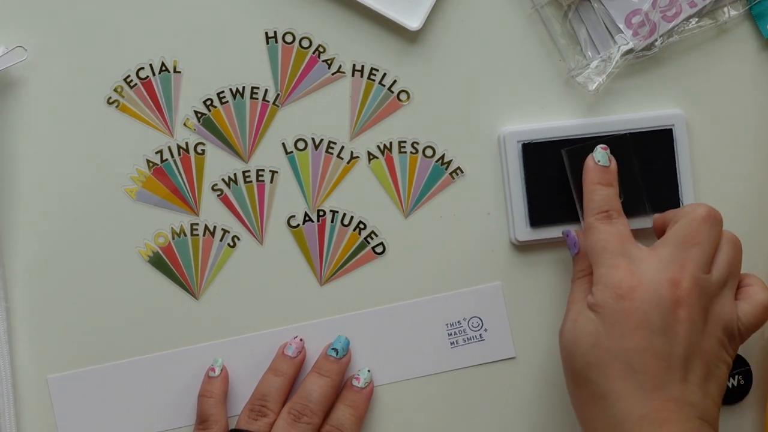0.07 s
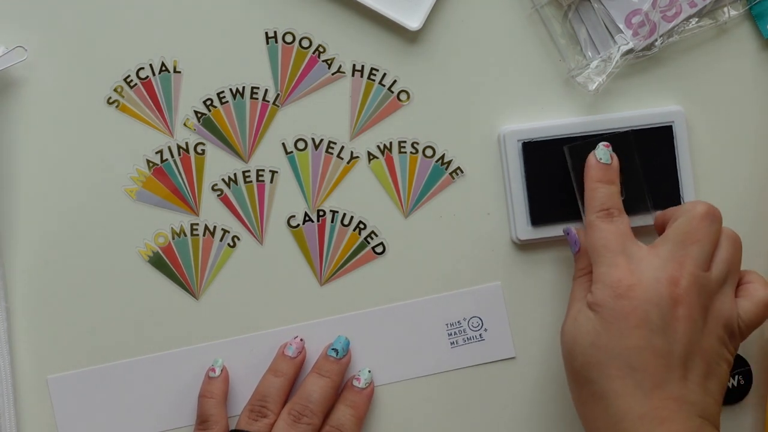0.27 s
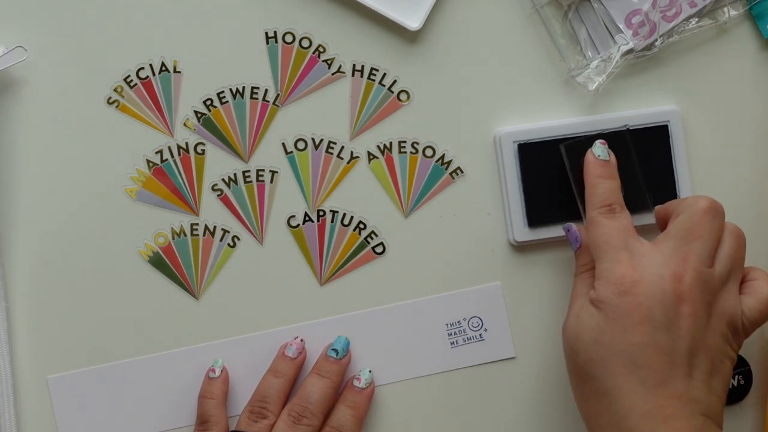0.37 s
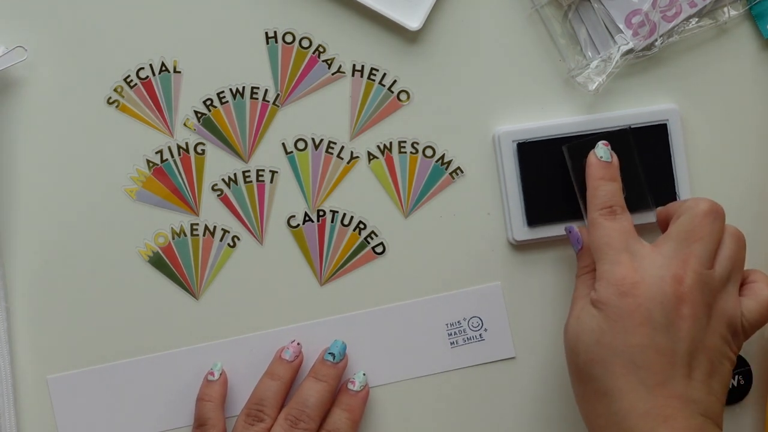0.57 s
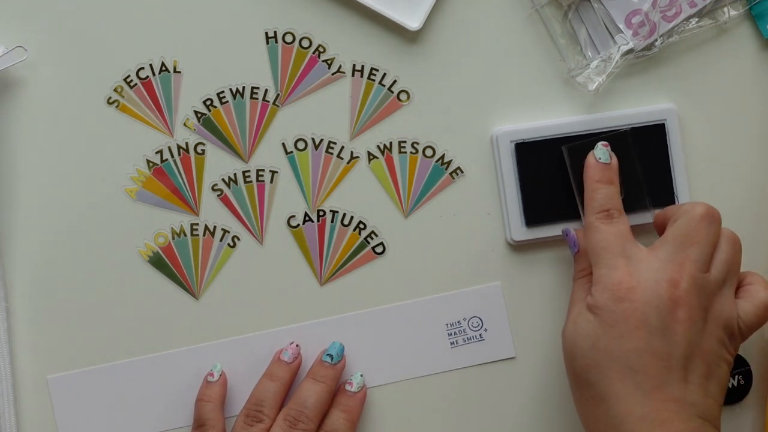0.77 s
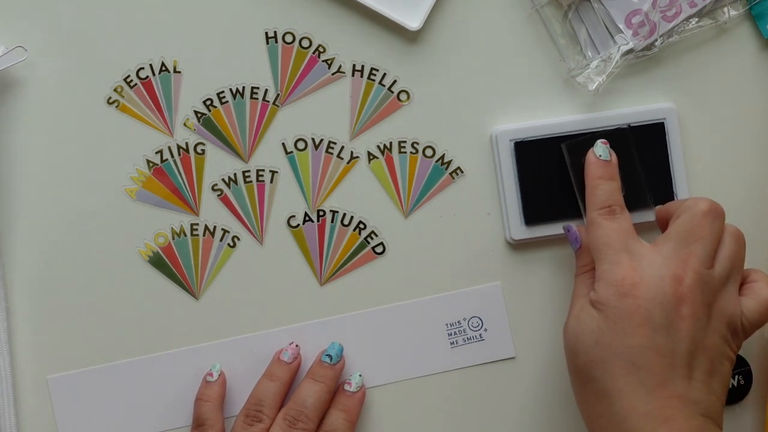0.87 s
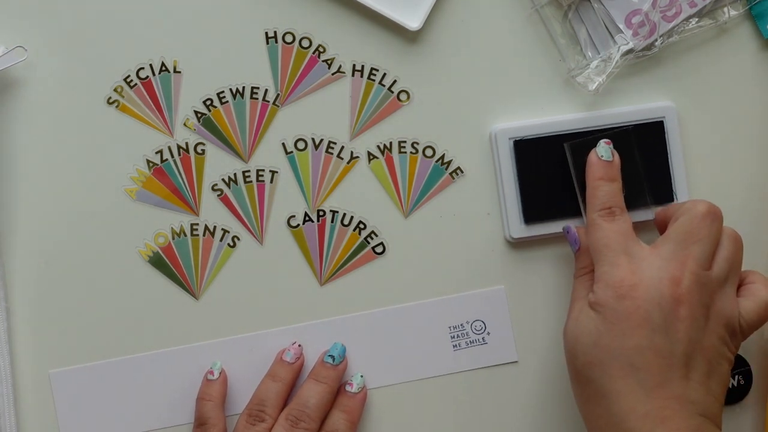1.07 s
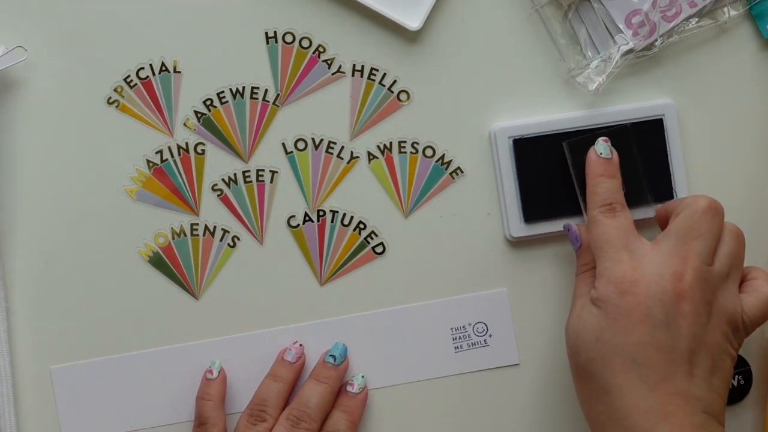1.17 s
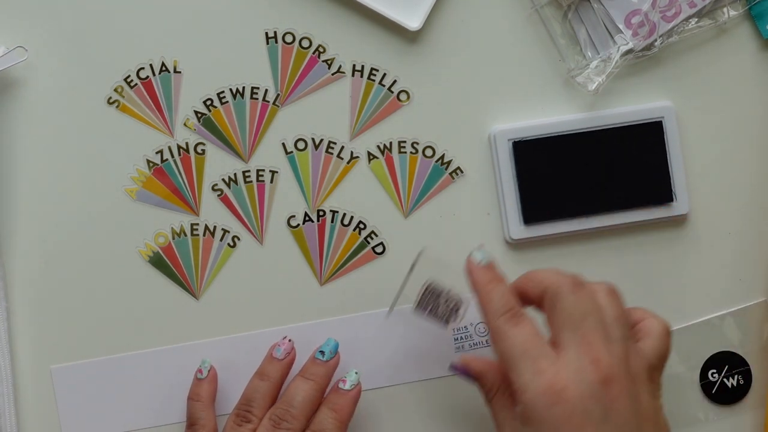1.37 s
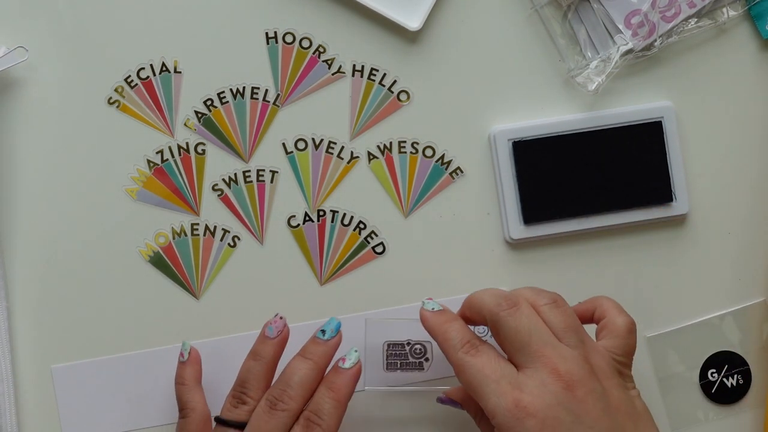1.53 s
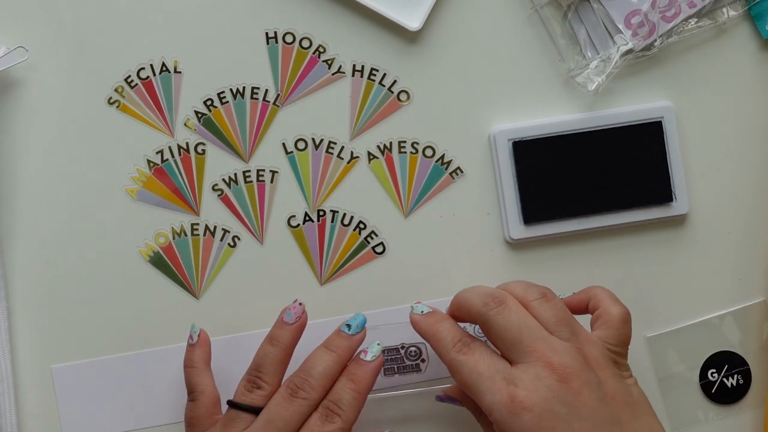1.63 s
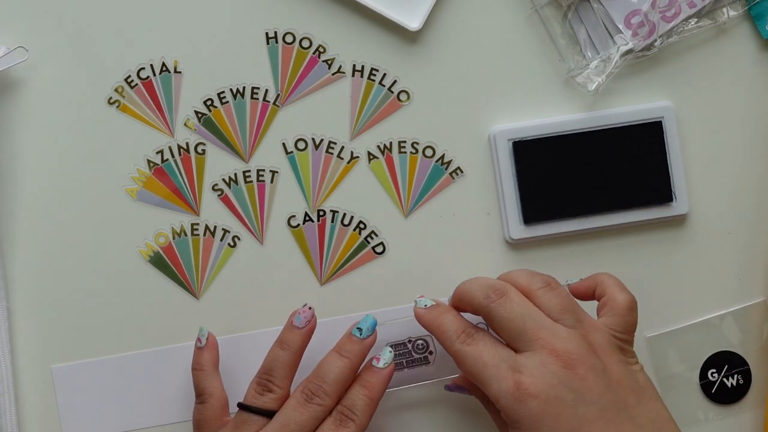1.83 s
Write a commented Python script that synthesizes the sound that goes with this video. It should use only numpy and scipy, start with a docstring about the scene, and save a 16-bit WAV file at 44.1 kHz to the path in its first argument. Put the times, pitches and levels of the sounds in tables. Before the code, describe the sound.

A plastic stamp block taps six times on an ink pad in a small room.

```python
"""A clear acrylic stamp block is tapped on an ink pad that lies on a table in a small room.
Each tap is a double impact, edge first, then flat: it excites the modes of block and plastic case (a clack)
and of the table top (a thump), with a burst of contact noise. The room adds low modes, a wall echo and
reverberation, and an object on the table rings on faintly. Soft lifts and brushes come between and after
the taps. A fan-like whine of narrow resonances sits to the right in quiet room noise."""
import sys
import numpy as np
from scipy import signal
from scipy.fft import rfft, irfft
from scipy.io import wavfile

SR = 44100
rng = np.random.default_rng(int(sys.argv[2]) if len(sys.argv) > 2 else 0)


def generate_wav(signal):
    """Clip the signal to [-1, 1] and save it as 16-bit WAV at the path in sys.argv[1]."""
    frames = np.transpose(np.atleast_2d(signal))
    scaled = np.clip(frames, -1, 1) * 32767
    pcm = np.round(scaled).astype(np.int16)
    wavfile.write(sys.argv[1], SR, pcm)


N = 83790

CONTACT_LEAD_S = 0.003  # contact noise begins this long before the edge strikes
CLACK_SEND_DB, CONTACT_SEND_DB = -7, 3.5  # into the reverberation
WALL_DELAY_S, WALL_ECHO_DB = 0.024, -13
# Stamp impacts; the first only rings into the start. Columns: start_s, thump_db, clack_db,
# brightness_db_per_octave, spot_on_pad (0-1), edge_to_flat_s, after_ring_db, hardness_db_per_octave
STAMP_TAPS = [(-0.04, -4.5, -10.5, -20, 0.3, .0022, -14, -8.5), (0.2190, -1, 2, 0.6, 0, 0.0025, -3.5, 0.5),
              (0.4201, 1, -0.5, 0, 0.12, 0.002045, 0, -2), (0.5984, -4, -13.5, -11, 0.68, 0.00187, -6, 0),
              (0.764, 0.5, 0, -3.5, 0.91, .0019, -5, 1), (0.9139, 2.5, 4.5, -1, 0.77, 0.002, -13, 0.5),
              (1.0694, 2, 3, -1, 0.84, .0019, -8, -5)]
def stamp_taps():
    """Impact excitation: each tap drives block, table, room and a nearby object; the responses add."""
    t, out = np.arange(SR // 2) / SR, np.zeros((2, N))
    boom, after_ring = room_modes(t), sympathetic_ring()
    for start_s, thump_db, clack_db, brightness, spot, flat_s, ring_db, hardness in STAMP_TAPS:
        clack = amp(clack_db) * block_clack(t, brightness, spot, flat_s)
        grit = amp(clack_db) * contact_noise(t, brightness)
        thump = amp(thump_db) * table_thump(t, hardness)
        click = np.linalg.norm(grit[0]) * contact_click(t, brightness)
        send = amp(CLACK_SEND_DB) * clack + amp(CONTACT_SEND_DB) * click + thump
        reverb = signal.fftconvolve(send[None], room_tail(t), axes=1)[:, :len(t)]
        echo = amp(WALL_ECHO_DB) * delayed(clack, WALL_DELAY_S)
        tap = clack + grit + thump + amp(thump_db) * boom + echo + reverb
        add(out, start_s - CONTACT_LEAD_S, pan_right(tap))
        add(out, start_s, amp(ring_db) * after_ring)
    return out


CLACK_DB, CLACK_RISE_S, EDGE_DB = -31, 0.00058, -9
# Modes of block and pad case. Columns: pitch_hz, level_at_spot_0_db, level_at_spot_1_db, t60_s
BLOCK_MODES = [(1098, -4, -27, 0.051), (1290, -10.5, -1, 0.056), (1410, -5.5, 4.5, 0.022),
               (1512, 9, 1, 0.022), (1803, 6, -12, .045), (1930, 2, -26, .026), (2114, -67, 9, 0.032),
               (2388, -6.5, 4.5, 0.019), (2870, -15, -11.5, 0.055), (3127, -7.5, -5.5, 0.027),
               (3872, -12.5, -4.5, .025), (4606, -9, -5.5, 0.017)]
def block_clack(t, brightness, spot, flat_s):
    """Modal vibration: the strike point weights the modes; the edge hits softly, then the face harder."""
    body = sum(damped_mode(t, hz, db0 + (db1 - db0) * spot + brightness * np.log2(hz / 1600), t60)
               for hz, db0, db1, t60 in BLOCK_MODES)
    body *= 1 - np.exp(-t / CLACK_RISE_S)
    edge = amp(EDGE_DB) * delayed(body, CONTACT_LEAD_S)
    face = delayed(body, CONTACT_LEAD_S + flat_s)
    return amp(CLACK_DB) * (edge + face)


CONTACT_DB, CONTACT_RISE_S, CONTACT_T60_S = -29, 0.0034, 0.042
# Spectrum of the gritty contact noise. Columns: frequency_hz, density_db
CONTACT_SPECTRUM = [(60, -45), (200, -7.5), (500, 7), (900, -7), (1600, 6.5), (2800, -3), (4500, -16.5),
                    (6000, -23.5), (9000, -35.5), (15000, -59)]
def contact_colour(hz, brightness):
    """Spectral tilt: a brighter tap puts more treble into the contact noise."""
    return amp(curve(CONTACT_SPECTRUM, hz) + brightness * np.log2(1 + hz / 1600))


def contact_noise(t, brightness):
    """Broadband contact noise swells as the faces close, then decays exponentially."""
    grit = noise(contact_colour(frequencies(len(t)), brightness), coherence=0.91, size=len(t))
    swell = np.minimum(t / CONTACT_RISE_S, 1) ** 2
    return amp(CONTACT_DB) * grit * swell * decay(np.maximum(t - CONTACT_RISE_S, 0), CONTACT_T60_S)


def contact_click(t, brightness):
    """Equivalent impulse: a unit-energy click with the contact noise's spectrum, to excite the room."""
    hz = frequencies(len(t))
    click = irfft(contact_colour(hz, brightness) * np.exp(-2j * np.pi * hz * CONTACT_RISE_S), len(t))
    return click / np.linalg.norm(click)


THUMP_DB, THUMP_RISE_S, THUMP_LEAD_S = -24, 0.0022, 0.001575
REBOUND_S, REBOUND_DB = 0.006758, 1.5
# Modes of the table top. Columns: pitch_hz, level_db, t60_s
TABLE_MODES = [(181.8, 1, 0.026), (259.3, 2.5, .022), (461, -11.5, 0.037), (632, -9, 0.033),
               (702, -17, 0.069)]
def table_thump(t, hardness):
    """Damped plate vibration: the table top is pushed down and rings; the thump comes back once."""
    body = -sum(damped_mode(t, hz, db + hardness * np.log2(hz / 250), t60) for hz, db, t60 in TABLE_MODES)
    body *= 1 - np.exp(-t / THUMP_RISE_S)
    body = signal.sosfilt(signal.butter(2, 125, "highpass", fs=SR, output="sos"), body)
    rebound = amp(REBOUND_DB) * delayed(body, REBOUND_S)
    return amp(THUMP_DB) * delayed(body + rebound, CONTACT_LEAD_S - THUMP_LEAD_S)


BOOM_DB, BOOM_RISE_S = -41, 0.0053
# Low room resonances. Columns: pitch_hz, level_db, t60_s, arrival_s
STANDING_WAVES = [(130.8, -0.5, 0.23, 0.01737), (149.2, 4.5, 0.12, 0.01634), (204.9, 4.5, .15, 0.01434),
                  (260.6, -4.5, 0.23, 0.0153), (319.3, -7, 0.22, .018)]
def room_modes(t):
    """Standing waves: a thump sets off the room's low modes, which build up and die away."""
    swell = 1 - np.exp(-t / BOOM_RISE_S)
    return amp(BOOM_DB) * sum(delayed(swell * damped_mode(t, hz, db, t60), arrival_s)
                              for hz, db, t60, arrival_s in STANDING_WAVES)


TAIL_DELAY_S, TAIL_RISE_S = 0.0034, 0.01
CLUSTER_DB, CLUSTER_WIDTH_S = 5, 0.0022
# Diffuse field of the room. Columns: frequency_hz, level_db, t60_s
REVERB_BANDS = [(80, -30.5, 0.2), (250, -4, 0.38), (510, -14, 0.42), (890, -2, 0.34), (1770, -9, 0.31),
                (3340, -5.5, 0.33), (6900, -8, 0.58), (14000, -9, .2)]
def room_tail(t):
    """Reverberation: each band decays at its own rate, and a wall returns a cluster of echoes."""
    bass_coherence = 1 / (1 + (frequencies(len(t)) / 1500) ** 2)
    hz, frame_s, bands = signal.stft(noise(1, bass_coherence, len(t)), SR, nperseg=256)
    t60 = curve(REVERB_BANDS, hz, column=2)[:, None]
    unit_energy = np.sqrt(2 * np.log(1000) / t60 / SR)
    bands = bands * amp(curve(REVERB_BANDS, hz))[:, None] * decay(frame_s, t60) * unit_energy
    tail = signal.istft(bands, SR, nperseg=256)[1][:, :len(t)]
    cluster = amp(CLUSTER_DB * np.exp(-((t - WALL_DELAY_S) / CLUSTER_WIDTH_S) ** 2))
    return tail * cluster * np.clip((t - TAIL_DELAY_S) / TAIL_RISE_S, 0, 1)


RING_DB, RING_WIDTH_HZ, RING_RISE_S = -55.5, 100, 0.01
# Mode clusters of an object shaken on the table. Columns: centre_hz, level_db, t60_s
OBJECT_MODES = [(1826, 0.5, 1.19), (2184, -9.5, 1.5), (2550, -12, 1.2), (2880, -17, .9),
                (3384, -13.5, 0.97), (3680, -16.5, 1.5), (3966, -16, 1.56), (5100, -16.5, 0.64)]
def sympathetic_ring():
    """Sympathetic vibration: clusters of close, lightly damped modes beat as they die."""
    t, hz, out = np.arange(N) / SR, frequencies(N), np.zeros((2, N))
    for centre_hz, db, t60 in OBJECT_MODES:
        band = np.exp(-((hz - centre_hz) / RING_WIDTH_HZ) ** 2)
        out += amp(db) * noise(band, coherence=1, size=N) * decay(t, t60)
    return amp(RING_DB) * out * np.minimum(t / RING_RISE_S, 1)


LIFT_HZ = 308
# The block pulling off the pad. Columns: start_s, length_s, level_db
PAD_LIFTS = [(0.161, 0.013, -60), (0.36, 0.032, -50.5), (1.201, 0.025, -54)]
def pad_lifts():
    """Release of adhesion: one soft low note swells as the block leaves the sticky pad."""
    out = np.zeros(N)
    for start_s, length_s, db in PAD_LIFTS:
        t = np.arange(0, length_s, 1 / SR)
        add(out, start_s, amp(db) * np.sin(np.pi * t / length_s) * np.sin(2 * np.pi * LIFT_HZ * t))
    return out


BRUSH_HZ = 3850
# Light brushes on pad and paper. Columns: start_s, length_s, level_db
BRUSH_STROKES = [(0.144, 0.027, -75), (1.46, 0.083, -77)]
def brushes():
    """Sliding friction: short, soft swells of band-limited hiss."""
    out, ratio = np.zeros((2, N)), (frequencies(N) / BRUSH_HZ) ** 2
    for start_s, length_s, db in BRUSH_STROKES:
        t = np.arange(0, length_s, 1 / SR)
        hiss = noise(ratio / (1 + ratio ** 2), coherence=0.38, size=N)[:, :len(t)]
        add(out, start_s, amp(db) * np.sin(np.pi * t / length_s) * hiss)
    return out


# Resonances of the whine. Columns: centre_hz, half_width_hz, left_db, right_db
WHINE_PEAKS = [(663, 12, -88, -75.5), (847, 48, -92, -57), (1155, 70, -88, -65.5), (1870, 42, -71, -69),
               (2006, 80, -73.5, -88), (5380, 51, -90, -86.5)]
def whine():
    """Resonance: noise confined to narrow peaks is heard as a steady, fan-like whine."""
    hz = frequencies(N)
    return sum(amp([[left], [right]]) * noise(1 / (1 + ((hz - centre) / width) ** 2), coherence=0, size=N)
               for centre, width, left, right in WHINE_PEAKS)


AMBIENT_DB = -64
# Spectrum of the room noise. Columns: frequency_hz, density_db
AMBIENT_SPECTRUM = [(25, -32), (60, -7), (130, -3.5), (300, 0), (500, -1.5), (700, 5.5), (1400, -1.5),
                    (2100, -2), (2600, -12), (5000, -17.5), (8000, -21.5), (15500, -25.5)]
# Its left-right likeness. Columns: frequency_hz, coherence (0-1)
AMBIENT_COHERENCE = [(60, 0.56), (300, 0), (700, 0), (3000, 0), (7000, 0.51), (14000, 1)]
def room_noise():
    """Stationary noise: low coherence between the ears makes its middle range sound wide."""
    hz = frequencies(N)
    return amp(AMBIENT_DB) * noise(amp(curve(AMBIENT_SPECTRUM, hz)), curve(AMBIENT_COHERENCE, hz), N)


def pan_right(x, difference_db=2, corner_hz=450):
    """Interaural level difference: the treble leans right while the bass stays central."""
    hz = frequencies(x.shape[-1])
    pan_db = difference_db * hz ** 4 / (hz ** 4 + corner_hz ** 4)
    return irfft(rfft(x) * amp(np.array([-pan_db, pan_db]) / 2), x.shape[-1])


def amp(db):
    """Decibels to amplitude ratio."""
    return 10 ** (np.asarray(db) / 20)


def frequencies(size):
    """Fourier bin frequencies in Hz."""
    return np.fft.rfftfreq(size, 1 / SR)


def curve(table, hz, column=1):
    """Interpolation of a table column along log frequency."""
    columns = np.transpose(table)
    return np.interp(np.log(hz + 1), np.log(columns[0] + 1), columns[column])


def add(mix, start_s, sound):
    """Superposition of a sound on the mix from start_s."""
    at = round(start_s * SR)
    part = mix[..., max(at, 0):]
    sound = sound[..., max(-at, 0):][..., :part.shape[-1]]
    part[..., :sound.shape[-1]] += sound


def delayed(x, delay_s):
    """Delay by linear phase shift, keeping the length."""
    size = x.shape[-1]
    return irfft(rfft(x, 2 * size) * np.exp(-2j * np.pi * frequencies(2 * size) * delay_s))[..., :size]


def decay(t, t60):
    """Exponential decay of 60 dB in t60 seconds."""
    return np.exp(-np.log(1000) * t / t60)


def damped_mode(t, hz, db, t60):
    """Free vibration of a damped oscillator."""
    return amp(db) * decay(t, t60) * np.sin(2 * np.pi * hz * t)


def noise(gain, coherence, size):
    """Stereo noise of rms 1 with a given spectrum and left-right coherence."""
    a, b = rfft(rng.standard_normal((2, size)))
    mid, side = a * np.sqrt(1 + coherence), b * np.sqrt(1 - coherence)
    x = irfft(np.array([mid + side, mid - side]) * gain, size)
    return x / np.sqrt(np.mean(x ** 2) + 1e-20)


def scene():
    """Superposition of the stamp's sounds and the background."""
    return stamp_taps() + pad_lifts() + brushes() + room_noise() + whine()


def record(dry):
    """Band limiting: the microphone's low cut, then a steep low-pass."""
    low_cut_hz, high_cut_hz = 39, 15700
    hz = frequencies(2 * N)
    cut = irfft(rfft(dry, 2 * N) * hz ** 4 / (hz ** 4 + low_cut_hz ** 4))[:, :N]
    low_pass = signal.firwin(511, high_cut_hz, window=("kaiser", 9), fs=SR)
    return signal.oaconvolve(cut, low_pass[None], "same")


dry = scene()
out = record(dry)
generate_wav(out)
```